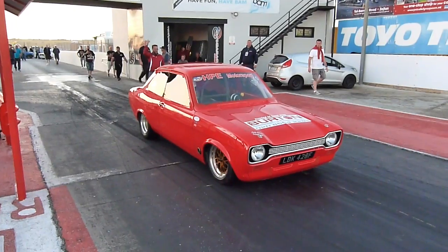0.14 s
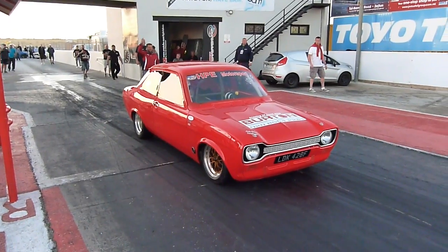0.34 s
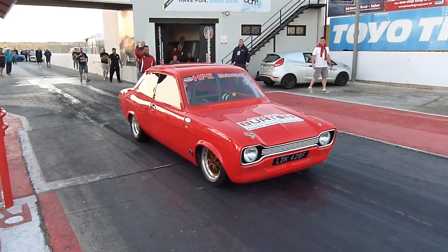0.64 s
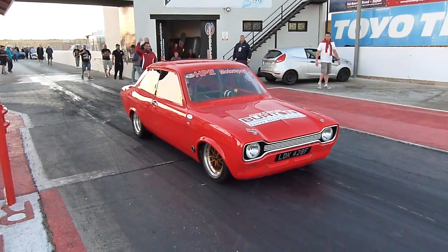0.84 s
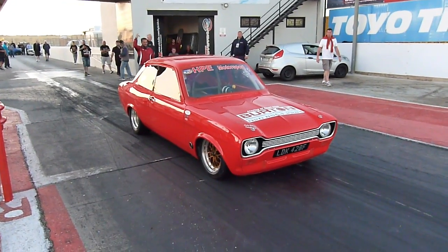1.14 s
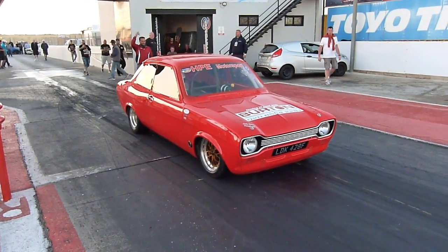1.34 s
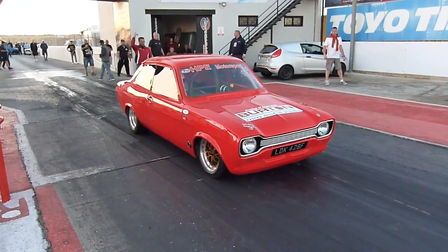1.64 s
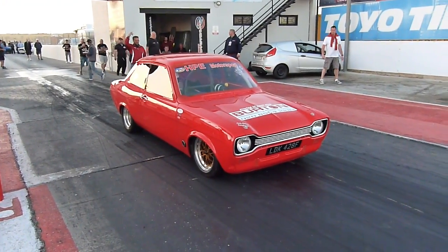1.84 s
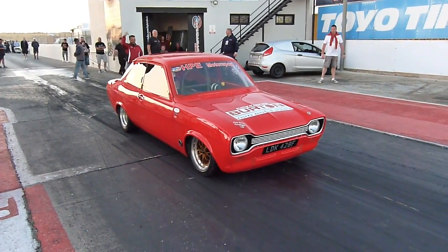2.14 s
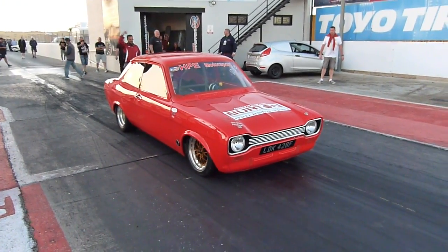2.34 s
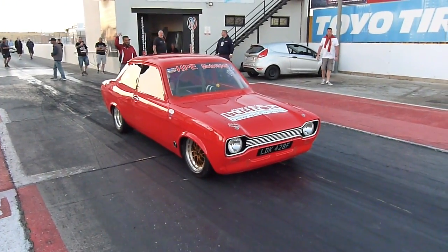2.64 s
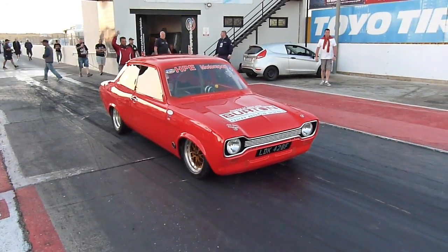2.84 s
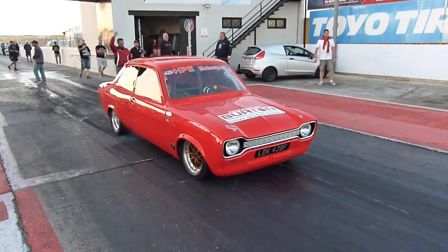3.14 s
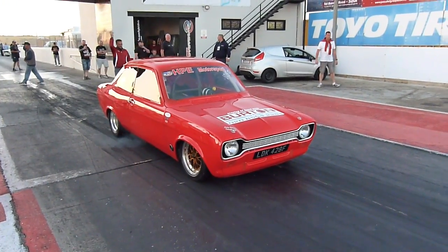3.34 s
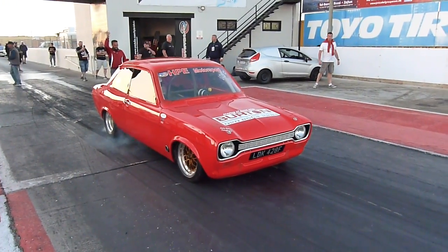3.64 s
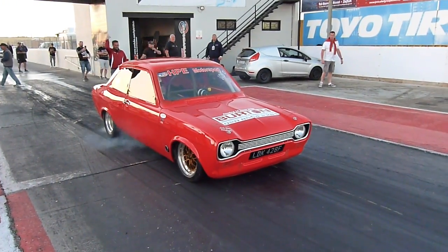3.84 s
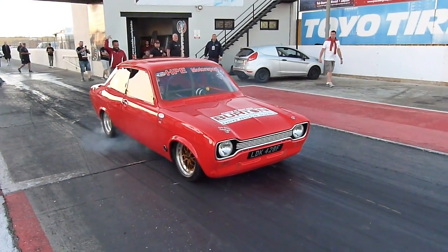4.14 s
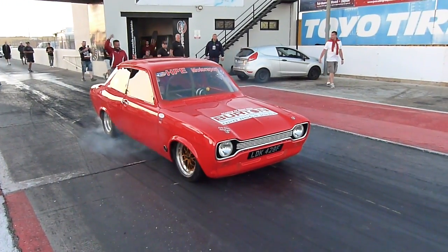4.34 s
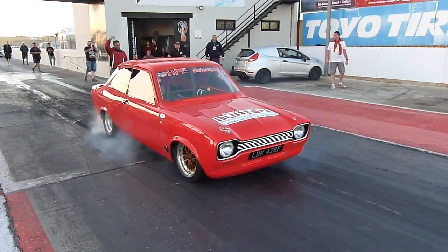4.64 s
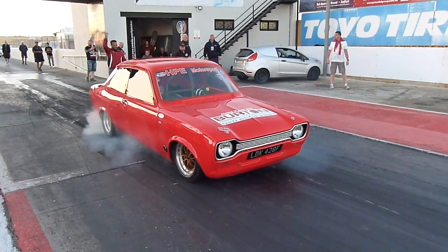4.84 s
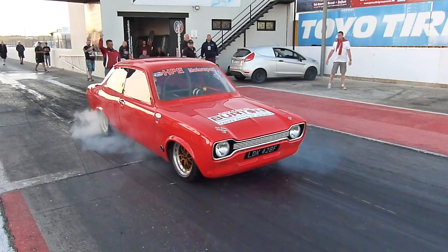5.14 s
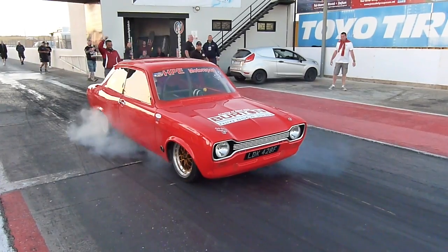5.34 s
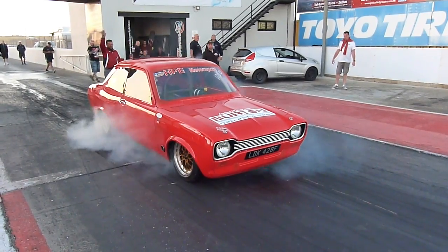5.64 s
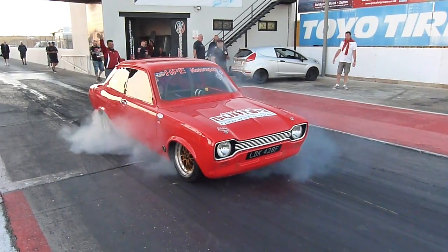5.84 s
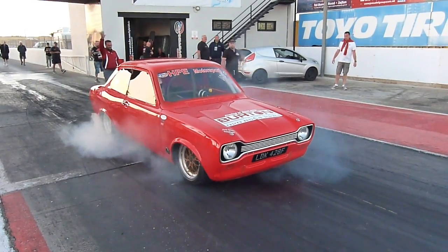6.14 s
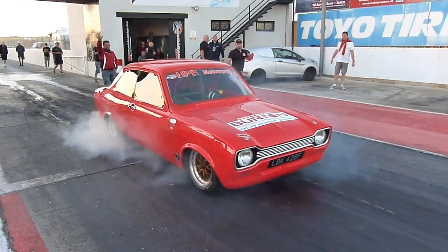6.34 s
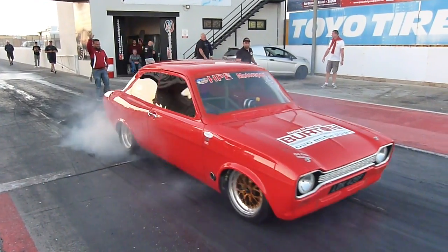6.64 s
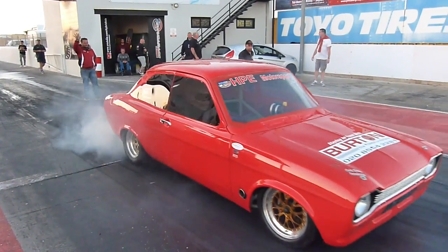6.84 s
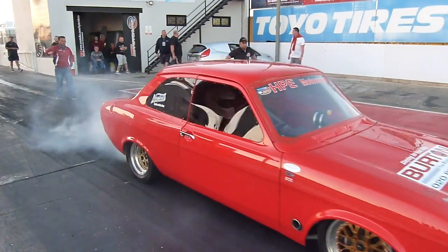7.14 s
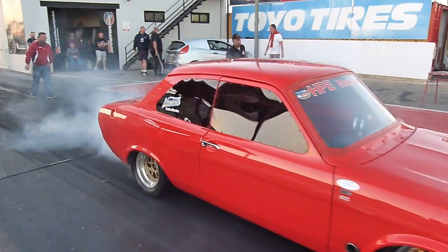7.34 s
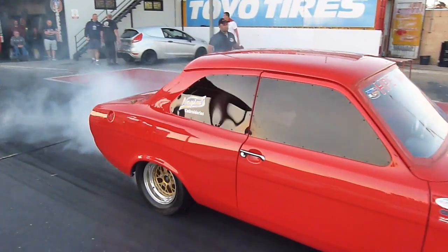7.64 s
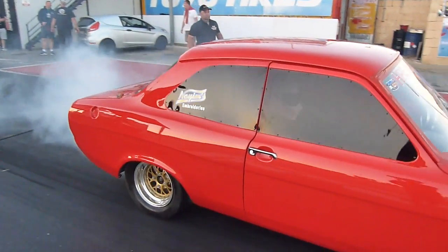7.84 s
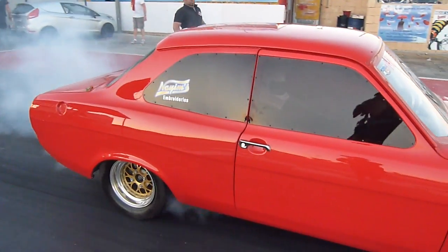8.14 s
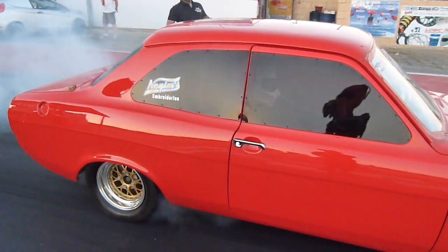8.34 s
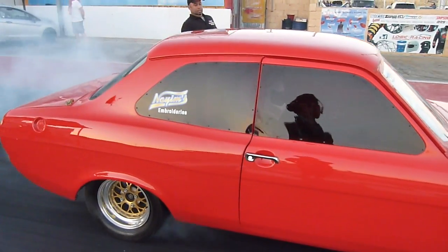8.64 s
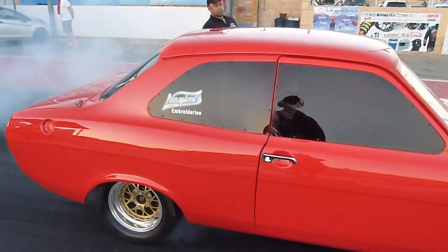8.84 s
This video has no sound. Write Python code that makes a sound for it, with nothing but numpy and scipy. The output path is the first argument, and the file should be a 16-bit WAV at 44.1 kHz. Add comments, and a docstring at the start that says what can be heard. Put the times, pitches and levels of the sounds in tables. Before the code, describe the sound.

A loud open exhaust howls through a burnout, mid-pitched and buzzing, with tearing bursts of gas and stray pops. The throttle then closes, the roar dies in a moment, and slower uneven firings throb and mutter, broken by brief hard revs. Close stereo microphone outdoors, hard pit-wall reflections, the car drifting slightly right near the end.

```python
"""A four-cylinder drag car does a burnout, its revs swinging as the rear tyres spin. Each firing is a sharp
pulse that rings the open exhaust and throws out a rasping puff of noisy gas. Stray fuel bangs in the pipe. Then
the throttle shuts, and slower, uneven firings make a lumpy rumble. Three blips, each opened by a hard bang, add
short runs of hard firings as the car rolls to the right; a pit wall echoes it all."""
import sys
import numpy as np
from scipy import signal
from scipy.fft import rfft, irfft
from scipy.io import wavfile
from scipy.ndimage import uniform_filter1d, map_coordinates

SR = 44100
rng = np.random.default_rng(int(sys.argv[2]) if len(sys.argv) > 2 else 0)


def pcm_store(signal):
    """Save signal as 16-bit PCM."""
    levels = np.round(np.clip(np.atleast_2d(signal), -1, 1) * 32767)
    wavfile.write(sys.argv[1], SR, levels.astype(np.int16).T)


N = 396459
TIME = np.arange(N) / SR  # seconds
GRID = np.maximum(np.arange(4097) * SR / 8192, 1)  # frequencies at which filters are drawn, Hz

# Turning points of the revs while the tyres spin. Each row: time in seconds, firing rate in Hz.
SPIN_REVS = [(0.27, 270.6), (0.87, 275.7), (1.46, 255.1), (1.72, 258.8), (2.11, 257.1), (2.439, 275.6),
             (2.55, 270), (2.841, 287.4), (3.37, 250.4), (3.78, 276.5), (4.018, 264.5), (4.291, 276.7),
             (4.53, 256.0), (4.87, 287), (5.13, 253.2), (5.44, 279.5), (5.61, 263.6), (5.93, 286.3),
             (6.031, 279.1), (6.15, 279.1)]
# Revs once the tyres grip, with a lift at each blip. Each row: time in seconds, firing rate in Hz.
RUN_DOWN_REVS = [(6.17, 278.4), (6.33, 191.7), (6.46, 124.2), (6.6, 106.4), (6.84, 91.9), (6.915, 115.4),
                 (6.95, 115.5), (7.03, 144.6), (7.6, 89.9), (8.13, 57.33), (8.32, 47.4), (8.424, 95.6),
                 (8.77, 65.24), (8.99, 60.2)]
# Habits of the four cylinders. Each row: strength in dB, lateness as a share of the firing interval.
CYLINDERS = [(-0.1, 0.0061), (1.5, -0.009), (-0.5, -0.0028), (0.34, -0.0058)]
# Spells of afterburning. Each row: start in seconds, end in seconds, extra gas in dB,
# scatter of firing strength in dB during the spell.
AFTERBURN = [(1.539, 1.67, 6.5, 2), (2.197, 2.273, 2.5, 0.5), (2.724, 2.98, 4.5, 0.8), (3.5, 3.57, 4, 0.5),
             (4.082, 4.168, 3, -0.3), (4.573, 4.63, 3, 1), (4.824, 4.92, 4.5, 1.5), (5.173, 5.35, 4.5, 1.2),
             (5.874, 5.943, 3.5, 1), (6.07, 6.181, 5, 2.1), (6.19, 6.353, 7, 1.3)]
# Slow swell of the treble under load. Each row: time in seconds, change in dB.
TREBLE = [(.3, 0.5), (.6, 1.5), (1.15, 2.5), (1.45, 0), (2.0, -1), (2.6, 1.5), (3.15, -0.5), (3.65, 0.5),
          (4.25, 1.5), (5.0, -3), (5.3, 0), (5.55, -4), (5.75, 3.5), (6.0, -6.5), (6.15, -1)]
# Resonances of the hot exhaust, from low to high. Each row: pitch in Hz, width in Hz, strength in dB.
DRONE_MODES = [(292, 68, -1), (831.4, 87, -3)]
HOWL_MODES = [(403, 120, -12.5), (518.4, 83, 7)]
BARK_MODES = [(991, 45, 5), (1010, 410, -16), (1364, 148, 5), (1548, 15, -0.5), (1801, 174, 6),
              (2124, 57, -5), (2327, 154, -0.5), (2650, 36, -4.5), (3100, 81, -8.5), (3640, 190, -18),
              (4350, 340, -20), (4870, 450, -13.5)]
# Hollow overrun as the tyres grip. Each row: pitch in Hz, width in Hz, strength in dB.
OVERRUN_MODES = [(246, 180, 0), (423, 77, 1)]
# Colour of the gas under load. Each row: frequency in Hz, strength in dB.
RASP = [(50, -10), (130, 0.5), (350, 2), (700, 1.5), (1200, 0.5), (1800, 1), (2900, -3), (3400, -4),
        (4400, -1.5), (5800, -4), (8000, -3), (10600, -3), (13000, -9.5), (16000, -19)]
# Resonances that colour this gas. Each row: pitch in Hz, width in Hz, strength in dB.
RASP_MODES = [(2390, 460, -4.5), (3150, 130, -8), (3670, 460, -7), (5070, 80, -9.5), (6820, 790, -6.5)]
# Hard bangs in the pipe: lone bangs of unburnt fuel, and the first hard firings that open each blip. Each row:
# time in seconds, level in dB.
HARD_BANGS = [(1.528, -21), (1.537, -10), (1.622, -14), (3.554, -12), (5.292, -9.5), (6.195, -11), (6.856, -24),
              (6.8644, -14.5), (6.958, -8.5), (7.427, -42), (8.2564, -25), (8.3184, -19), (8.3376, -18),
              (8.742, -23.5)]
# Colour of a hard firing from low revs. Each row: frequency in Hz, strength in dB.
BANG = [(30, -16), (80, 0), (150, -1), (300, 4.5), (500, -3.5), (900, 3), (1500, -10), (3000, -54),
        (8000, -27)]
# Force of the firings with the throttle shut. Each row: time in seconds, force in dB.
FORCE = [(6.4, -6), (6.6, -13.5), (6.82, -5), (7.06, 1.5), (7.3, -4.0), (7.64, 3.5), (7.77, -2), (8.1, 0),
         (8.22, -6), (8.47, 1), (8.6, 9), (8.78, -1.5), (8.98, 2)]
# Moments when the coasting engine catches and the pipe throbs.
# Each row: middle in seconds, length in seconds, extra throb in dB.
CATCHES = [(6.838, 0.098, 12), (7.37, 0.058, 7), (7.471, .07, 11.5), (7.619, 0.045, 8), (7.722, 0.041, 7),
           (8.089, .12, 3)]
# Resonances of the idling exhaust, from low to high. Each row: pitch in Hz, width in Hz, strength in dB.
THUD_MODES = [(64.4, 35.6, -0.5), (136.35, 93, 0)]
RING_MODES = [(244.7, 42.5, 18), (380.7, 71, -20)]
BURBLE_MODES = [(655, 140, 9.5), (900, 160, 8.5), (1163, 120, 4.5), (1920, 440, -20), (2860, 760, -37)]
EDGE_MODES = [(1886, 120, 4.5), (2230, 130, 3), (2830, 160, 7.5), (3220, 180, 1)]
# Colour of the gas while coasting. Each row: frequency in Hz, strength in dB.
HISS = [(820, -13), (1400, -1.5), (1700, -2), (1880, -2), (2150, -3), (2720, -6), (3230, -4), (3720, -10),
        (4760, -8.5), (6520, -9.5), (8250, -16), (11700, -17.5), (16000, -35)]
# Throttle blips. Each row: start in seconds, end in seconds, level in dB, gas against thump in dB,
# tilt of the gas in dB per octave.
BLIPS = [(6.8752, 6.924, -21, -4, -4), (6.9644, 7.031, -26.5, 1, -4.5), (8.355, 8.432, -23.5, -1, 1)]
# Place of the car. Each row: time in seconds, left minus right in dB.
PAN = [(6, 0.5), (7.7, -2.5), (9, -1.8)]

# The throttle opens with the climb of the revs, a moment ahead of it.
FULL_CLIMB_HZ_PER_S, THROTTLE_LEAD_S = 147, 0.008
# Under load: base level of each voice at half throttle, and what opening it fully adds.
DRONE_DB, DRONE_THROTTLE_DB = -22.5, 4.5
HOWL_DB = -17.5
BARK_DB, BARK_THROTTLE_DB = -22.5, 1.3
GROWL_DB, GROWL_THROTTLE_DB = -30, -0.5
RASP_DB, RASP_THROTTLE_DB = -27, 3.5
BURN_SCATTER_DB, FLICKER_DB, FLICKER_HZ = 1.17, 2.3, 13
# Chance wobble: the revs as a share, the drone and howl in dB.
WOBBLE_HZ, REV_WOBBLE, DRONE_WOBBLE_DB, HOWL_WOBBLE_DB = 11, 0.001825, 1.4, 0.5
# Firing edges sing in the upper resonances, and more so once the tyres grip.
SIZZLE_DB, SIZZLE_OVERRUN_DB = -41, 8
# Drone and howl start lower and fill out over BUILD_S.
BUILD_DB, BUILD_S = -4, 1.74
# As the tyres grip, drone and howl drop and the hollow overrun comes in.
GRIP_S, GRIP_TIME_S, GRIP_DROP_DB, OVERRUN_DB = 6.185, .03, -11.5, -21
# The load comes off: the roar dies away and coasting fades in.
LIFT_S, LIFT_DB_PER_S, HANDOVER_S = 6.335, 175, 0.08
# Coasting: base level at a firing rate of COAST_HZ, rise per octave of revs, share of the firing force.
COAST_HZ = 90
THUD_DB, THUD_DB_PER_OCTAVE, THUD_SHARE = -33, 2.5, 0.31
BURBLE_DB, BURBLE_DB_PER_OCTAVE = -38.5, 12.5
HISS_DB, HISS_DB_PER_OCTAVE, HISS_SHARE = -43.5, 11, 0.53
THROB_DB, THROB_SHARE = -30, 0.96
# Edge is set against the hiss, rumble against the thud, flutter against the clear burble.
EDGE_DB, RUMBLE_DB, FLUTTER_DB = -8.5, -4.5, 2
COAST_SCATTER_DB, SCATTER_DB_PER_OCTAVE, SCATTER_PER_FORCE = 2.5, -2.2, -0.067
START_S, TOP_HZ = .265, 15900


def db_to_gain(db):
    """Decibels to gain."""
    return 10 ** (np.asarray(db) / 20)


def curve(rows):
    """A two-column table as a control over time, in straight lines between rows."""
    times, values = np.transpose(rows)
    return np.interp(TIME, times, values)


def unit(x):
    """Scale to an rms of 1."""
    return x / np.sqrt(np.mean(x ** 2) + 1e-18)


def hold(x, db, size=2600):
    """Make the short-term level of x follow db; single firings keep their differences."""
    power = uniform_filter1d(uniform_filter1d(x ** 2, size), size)
    return x * db_to_gain(db) / np.sqrt(np.abs(power) + 1e-14)


def mean_level(x, db, when):
    """Set the mean level of x over the time marked by when; its own swells stay."""
    return x * db_to_gain(db) / np.sqrt(np.average(x ** 2, weights=when))


def wander(rate_hz):
    """Slow chance with a spread near 1: straight lines between random points."""
    return 1.2 * np.interp(TIME * rate_hz, np.arange(1024), rng.standard_normal(1024))


def modes(rows):
    """Gain over frequency of a set of steep-sided resonances."""
    gain = 0
    for hz, width, db in rows:
        detuning = (GRID / hz - hz / GRID) * hz / width
        gain = gain + db_to_gain(db) / (1 + detuning ** 2)
    return gain


def slope(points):
    """Gain over frequency through (Hz, dB) points."""
    hz, db = np.transpose(points)
    return db_to_gain(np.interp(np.log(GRID), np.log(hz), db))


def ring(x, gain):
    """Pass x through a filter with this gain that answers as early as it can, never ahead of x."""
    cepstrum = irfft(np.log(gain + 1e-6))
    half = len(cepstrum) // 2
    # folding the cepstrum onto positive times gives minimum phase
    cepstrum[1:half] *= 2
    cepstrum[half + 1:] = 0
    response = irfft(np.exp(rfft(cepstrum)))[:half]
    return signal.oaconvolve(x, response)[:N]


def strikes(times, sizes):
    """Band-limited impulses, which can fall between samples."""
    at = np.asarray(times)[:, None] * SR
    taps = np.floor(at).astype(int) + np.arange(-3, 5)
    shape = np.sinc(taps - at) * np.sinc((taps - at) / 4)
    return np.bincount(np.clip(taps, 0, N - 1).ravel(), (shape * sizes[:, None]).ravel(), N)


def swell(pulses, rise_s):
    """A valve takes time to open: each pulse becomes a rounded hump that peaks after rise_s."""
    t = TIME[:400]
    hump = t * np.exp(-t / rise_s)
    return signal.oaconvolve(pulses, hump / hump.sum())[:N]


def puffs(pulses, decay_s, gain, spread=.4):
    """A dying burst of turbulence after each pulse, a little different in the two channels."""
    envelope = signal.lfilter([1], [1, -np.exp(-1 / (decay_s * SR))], pulses)
    mid = ring(envelope * rng.standard_normal(N), gain)
    side = ring(envelope * rng.standard_normal(N), gain * spread * GRID / (GRID + 1200))
    return np.array([mid + side, mid - side])


def engine_speed():
    """Firing rate: smooth swings during the burnout, then exponential run-downs and lifts."""
    times, hz = np.transpose(SPIN_REVS)
    rows = np.arange(len(times))
    turn = np.interp(TIME, times, rows)
    eased = np.floor(turn) + np.sin(np.pi / 2 * (turn % 1)) ** 2
    swings = np.interp(eased, rows, hz)
    times, hz = np.transpose(RUN_DOWN_REVS)
    run_down = np.exp(np.interp(TIME, times, np.log(hz)))
    return np.where(TIME < times[0], swings, run_down)


def throttle_of(hz):
    """Throttle from -1 (backed off) to 1 (wide open), a moment ahead of the revs."""
    climb = uniform_filter1d(np.gradient(hz) * SR, size=2200)
    return np.tanh(np.interp(TIME + THROTTLE_LEAD_S, TIME, climb) / FULL_CLIMB_HZ_PER_S)


def firing_times(hz, start, end):
    """The moments at which a cylinder fires: whenever the summed firing rate gains one."""
    count = np.cumsum(hz) / SR
    first, last = np.interp([start, end], TIME, count)
    return np.interp(np.arange(first, last), count, TIME)


def firings(hz, scatter_db, jitter):
    """Times, strengths and gas chance: each cylinder has its habit, each combustion its own scatter."""
    times = firing_times(hz, 0, N / SR)
    late_chance, size_chance, flare = rng.standard_normal((len(times), 3)).T
    habit_db, late = np.array(CYLINDERS)[np.arange(len(times)) % len(CYLINDERS)].T
    uneven_db = np.interp(times, TIME, scatter_db)
    delay = (late + jitter * uneven_db * late_chance) / np.interp(times, TIME, hz)
    return times + delay, db_to_gain(habit_db + uneven_db * size_chance), flare


def afterburn():
    """Extra gas and scatter of the firings (dB): each afterburning spell adds gas and sets its scatter."""
    gas_db, scatter_db = 0, BURN_SCATTER_DB
    for start, end, extra_db, uneven_db in AFTERBURN:
        spell = uniform_filter1d(1. * ((TIME > start) & (TIME < end)), size=1500)
        gas_db = gas_db + extra_db * spell
        scatter_db = scatter_db + (uneven_db - BURN_SCATTER_DB) * spell
    return gas_db, scatter_db


def cycle_noise(hz):
    """The part of the gas flow that comes out alike in every four-firing cycle of the engine."""
    cycles = np.cumsum(hz) / SR / len(CYLINDERS)
    one_cycle = signal.resample(rng.standard_normal(256), 4096)
    return np.interp(cycles % 1, np.arange(4096) / 4096, one_cycle)


def burnout(hz):
    """Under load: fast firings sweep through the pipe resonances, each with a crackling puff of gas."""
    throttle, roaring = throttle_of(hz), TIME < LIFT_S
    hz = hz * (1 + REV_WOBBLE * wander(WOBBLE_HZ))
    gas_db, scatter_db = afterburn()
    treble_db = curve(TREBLE) + FLICKER_DB * wander(FLICKER_HZ)
    times, sizes, flare = firings(hz, scatter_db, jitter=0.0081)
    pulses = strikes(times, sizes)

    # high revs bring the firing rate onto the drone, low revs bring its octave onto the howl
    drone_db = DRONE_THROTTLE_DB * throttle + DRONE_WOBBLE_DB * wander(WOBBLE_HZ)
    drone = mean_level(ring(pulses, modes(DRONE_MODES)), DRONE_DB, roaring) * db_to_gain(drone_db)
    howl = mean_level(ring(pulses, modes(HOWL_MODES)), HOWL_DB, roaring)
    howl = howl * db_to_gain(HOWL_WOBBLE_DB * wander(WOBBLE_HZ))
    gripped = np.clip((TIME - GRIP_S) / GRIP_TIME_S, 0, 1)
    low_db = BUILD_DB * np.maximum(1 - TIME / BUILD_S, 0) + GRIP_DROP_DB * gripped
    low = (drone + howl) * db_to_gain(low_db)
    hollow = ring(pulses, modes(OVERRUN_MODES))
    overrun = gripped * mean_level(hollow, OVERRUN_DB, gripped * roaring)
    bark_db = BARK_DB + BARK_THROTTLE_DB * throttle + 0.18 * gas_db + 0.68 * treble_db
    bark = hold(ring(pulses, modes(BARK_MODES)), bark_db)

    colour = slope(RASP) * (1 + modes(RASP_MODES))
    colour = colour * slope([(20, -7), (90, -2), (300, -0.5), (1200, -0.5)])
    # flow that repeats with the cycle adds tones at quarters of the firing rate: the growl
    flow = swell(pulses, rise_s=0.0014) * cycle_noise(hz)
    growl_tilt = slope([(130, -2.5), (400, 1), (1500, 0), (4500, -2.5), (9000, -14)])
    growl_db = GROWL_DB + GROWL_THROTTLE_DB * throttle + 0.2 * gas_db
    growl = hold(ring(flow, colour * growl_tilt), growl_db)
    flares = strikes(times, sizes * db_to_gain(5.1 * flare))
    gas = unit(puffs(flares, decay_s=0.0094, gain=colour, spread=0.5))
    # the hardest firings steepen into shock fronts that crackle
    fronts = strikes(times + rng.random(len(times)) / 1500, db_to_gain(6 * np.minimum(flare, 2)))
    shocks = db_to_gain(-6.5) * unit(ring(fronts, colour * GRID / (GRID + 3000)))
    rasp = hold(gas + shocks, RASP_DB + RASP_THROTTLE_DB * throttle + gas_db + treble_db)
    rasp = rasp * db_to_gain(1.2 * np.array([[1], [-1]]))  # stronger on the left
    sizzle = hold(ring(pulses, modes(RASP_MODES)), SIZZLE_DB + SIZZLE_OVERRUN_DB * gripped)
    return low + overrun + bark + sizzle + growl + rasp


def pit_wall(x, t60_s, wet_db, delay_s):
    """Scattered echoes from wall and buildings: dying noise, different on each side, weak in the bass."""
    t = TIME[:SR // 2]
    tails = rng.standard_normal((2, len(t))) * db_to_gain(-60 * t / t60_s) * (t > delay_s)
    wall = slope([(80, -61), (260, -15.5), (520, -10), (2000, -6.0), (6000, -5.0), (15000, -16.5)])
    source = ring(x.mean(axis=0), wall)
    echoes = [signal.oaconvolve(source, tail / np.linalg.norm(tail))[:N] for tail in tails]
    return db_to_gain(wet_db) * np.array(echoes)


def hard_bangs():
    """Hard bangs in the pipe, lone ones and those that open the blips: each bang is one thump and a spit of
    gas."""
    times, db = np.transpose(HARD_BANGS)
    pulses = swell(strikes(times, db_to_gain(db)), rise_s=0.00022)
    thump = ring(-pulses, slope(BANG))
    spit = puffs(pulses, decay_s=0.0084, gain=slope(RASP), spread=1.0)
    both = thump / np.abs(thump).max() + db_to_gain(-2.0) * spit / np.abs(spit).max()
    return db_to_gain(db.max()) * both


def coasting(hz):
    """Throttle shut: slow, uneven firings thud and burble over a soft hiss, duller as the revs sink."""
    force_db = curve(FORCE)
    octaves = np.log2(hz / COAST_HZ)
    thud_db = THUD_DB + THUD_DB_PER_OCTAVE * octaves + THUD_SHARE * force_db
    hiss_db = HISS_DB + HISS_DB_PER_OCTAVE * octaves + HISS_SHARE * force_db
    scatter_db = COAST_SCATTER_DB + SCATTER_DB_PER_OCTAVE * octaves + SCATTER_PER_FORCE * force_db
    scatter_db = np.maximum(scatter_db, .5)
    catch_db = sum(db * np.exp(-(2 * (TIME - s) / length) ** 2) for s, length, db in CATCHES)
    times, sizes, flare = firings(hz, scatter_db, jitter=0.0036)
    pulses = strikes(times, sizes)
    flares = strikes(times, sizes * db_to_gain(2.9 * flare))

    thud = hold(ring(-pulses, modes(THUD_MODES)), thud_db)
    # the pipe throbs each time a multiple of the firing rate crosses its main resonance
    throb = mean_level(ring(-pulses, modes(RING_MODES)), THROB_DB, TIME > LIFT_S + HANDOVER_S)
    throb = throb * db_to_gain(THROB_SHARE * force_db + catch_db)
    # even firings burble on a clear pitch; uneven ones break up into flutter
    clear = hold(ring(-pulses, modes(BURBLE_MODES)), 0)
    flutter = puffs(flares, decay_s=0.016, gain=modes(BURBLE_MODES), spread=0.35)
    flutter = hold(flutter, FLUTTER_DB + 4.5 * (scatter_db - COAST_SCATTER_DB))
    burble = hold(clear + flutter, BURBLE_DB + BURBLE_DB_PER_OCTAVE * octaves + force_db)
    hiss = hold(puffs(flares, decay_s=0.02, gain=slope(HISS), spread=0.93), hiss_db)
    # a little of each firing's edge gets through in the upper pipe modes, more at higher revs
    edge = ring(swell(-pulses, rise_s=0.00029), slope(HISS) * modes(EDGE_MODES))
    edge = hold(edge, hiss_db + EDGE_DB + 6 * octaves)
    rumble = ring(rng.standard_normal(N), slope(BANG) * slope([(250, -4.5), (1000, -17)]))
    rumble = hold(rumble, thud_db + RUMBLE_DB)
    return thud + throb + burble + hiss + edge + rumble


def blips(hz):
    """A stab of throttle: a short run of hard firings, each a thump with a sharp crack of gas."""
    out = 0
    for start, end, db, gas_db, tilt_db in BLIPS:
        times = firing_times(hz, start, end)
        pulses = strikes(times, db_to_gain(0.56 * rng.standard_normal(len(times))))
        thump = unit(ring(swell(-pulses, rise_s=0.00028), slope(BANG)))
        colour = slope(RASP) * db_to_gain(tilt_db * np.log2(1 + GRID / 1500))
        crack = unit(puffs(swell(pulses, rise_s=0.00039), decay_s=0.0039, gain=colour, spread=0.42))
        # the level counts over the blip alone, not over the whole sound
        share = np.sqrt((end - start) * SR / N)
        out = out + db_to_gain(db) * share * (thump + db_to_gain(gas_db) * crack)
    return out


def scene():
    """The burnout gives way to coasting and blips as the car moves to the right."""
    hz = engine_speed()
    load = db_to_gain(-LIFT_DB_PER_S * np.maximum(TIME - LIFT_S, 0))
    rolling = np.clip((TIME - LIFT_S) / HANDOVER_S, 0, 1)
    car = load * burnout(hz) + hard_bangs() + rolling * coasting(hz) + blips(hz)
    pan_db = curve(PAN)
    # off to the right, the sound reaches the left side a little later
    heard_at = np.arange(N) + 0.68 * np.minimum(pan_db, 0)
    left = map_coordinates(car[0], [heard_at], order=3)
    direct = np.array([left, car[1]]) * db_to_gain(np.array([pan_db, -pan_db]) / 2)
    return direct + pit_wall(car, t60_s=0.26, wet_db=-2, delay_s=0.0029)


def record(dry):
    """The sound starts abruptly, mid-burnout; the highest peaks are rounded and the top is cut off."""
    started = dry * (TIME > START_S)
    rounded = started / (1 + (dry / .8) ** 6) ** (1 / 6)
    low_pass = signal.ellip(12, .2, 80, TOP_HZ, fs=SR, output="sos")
    return signal.sosfilt(low_pass, rounded)


dry = scene()
out = record(dry)
pcm_store(out)
```